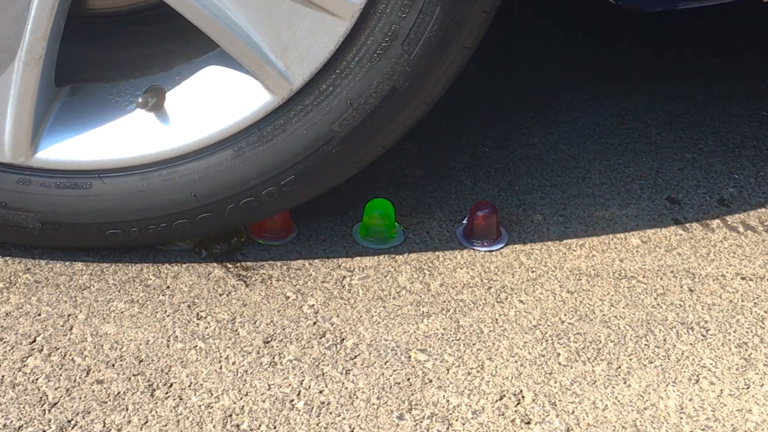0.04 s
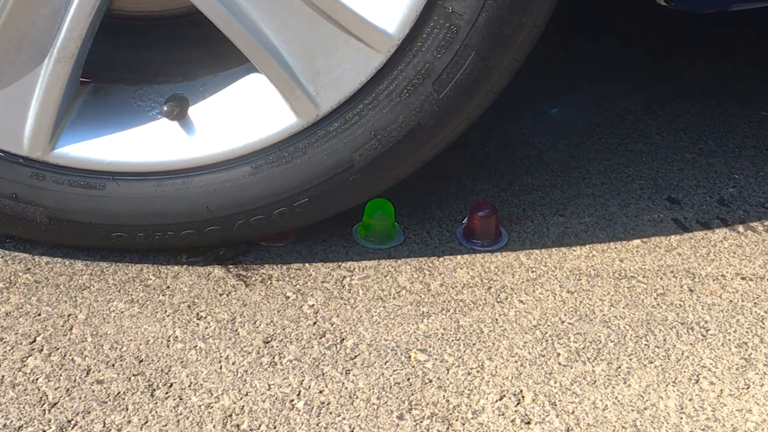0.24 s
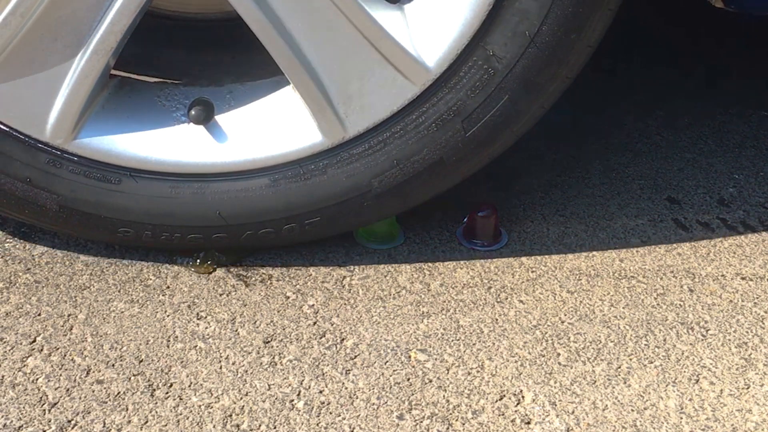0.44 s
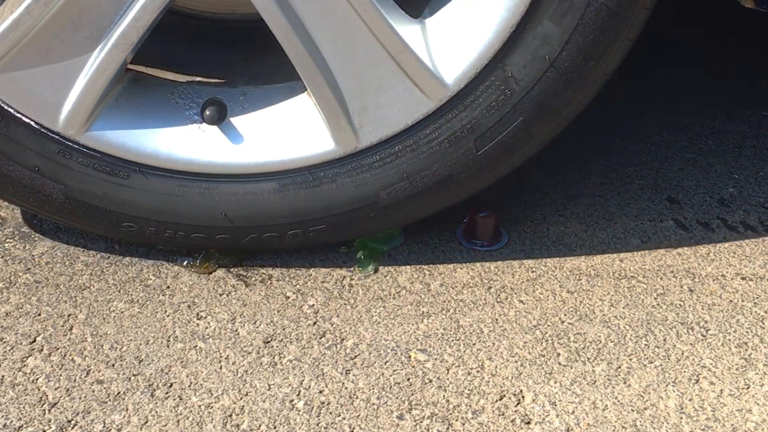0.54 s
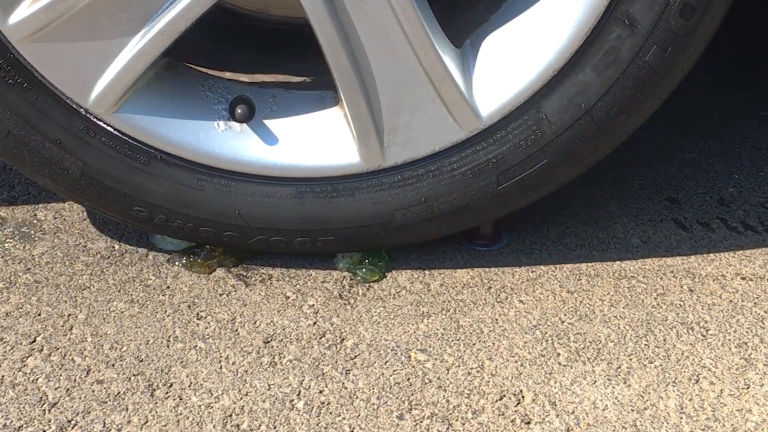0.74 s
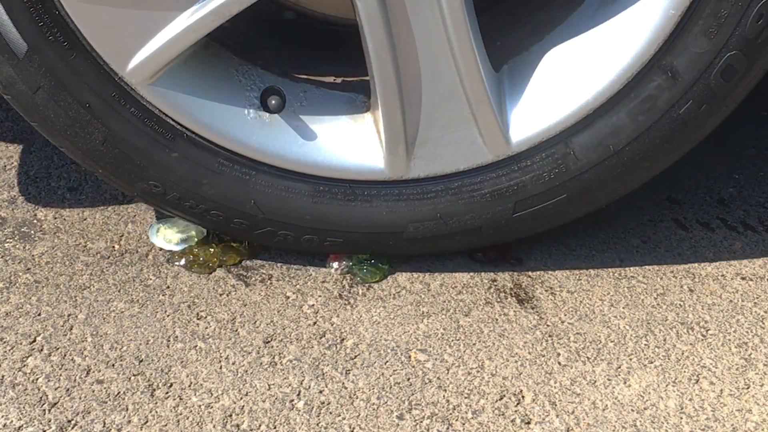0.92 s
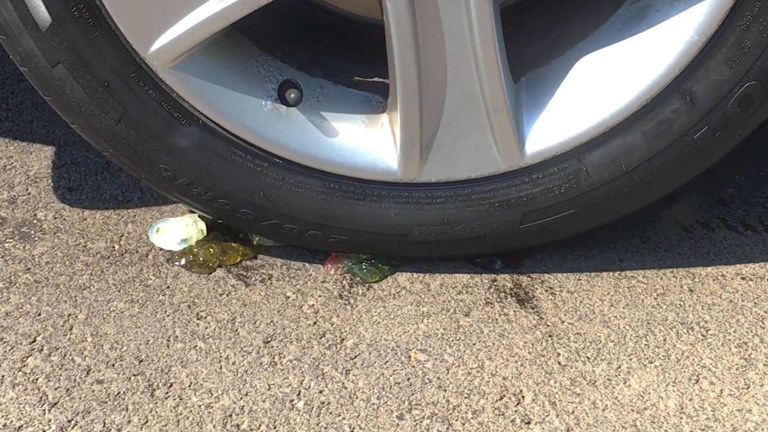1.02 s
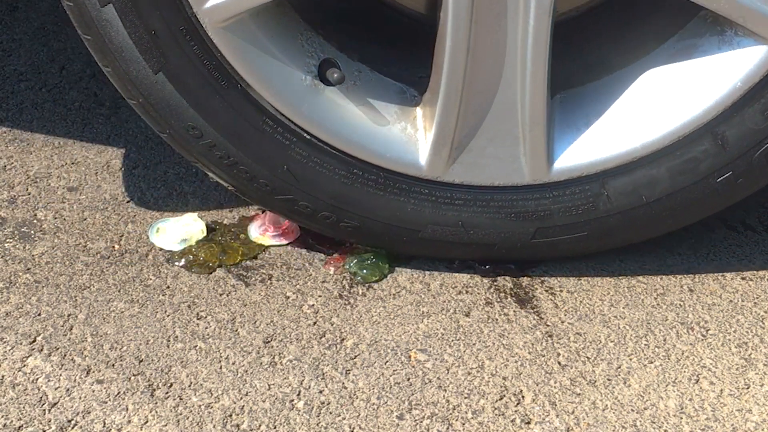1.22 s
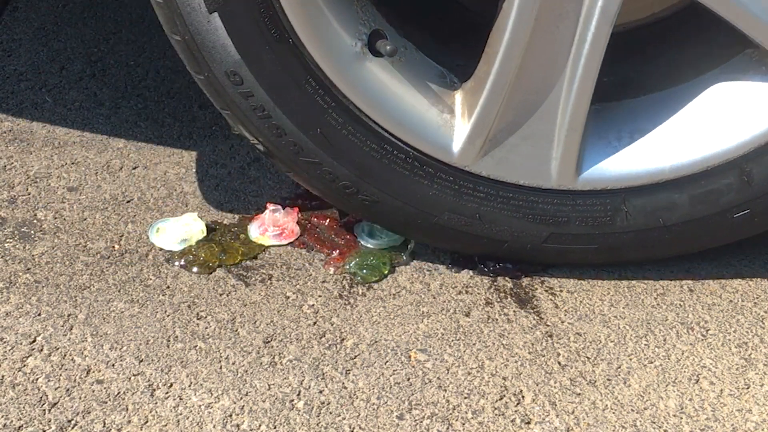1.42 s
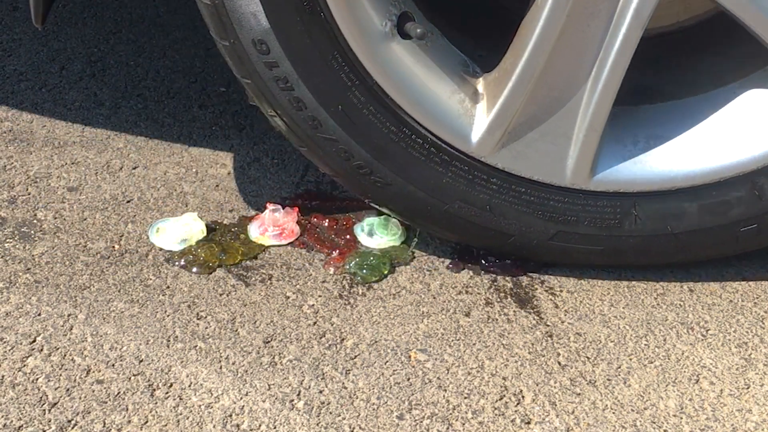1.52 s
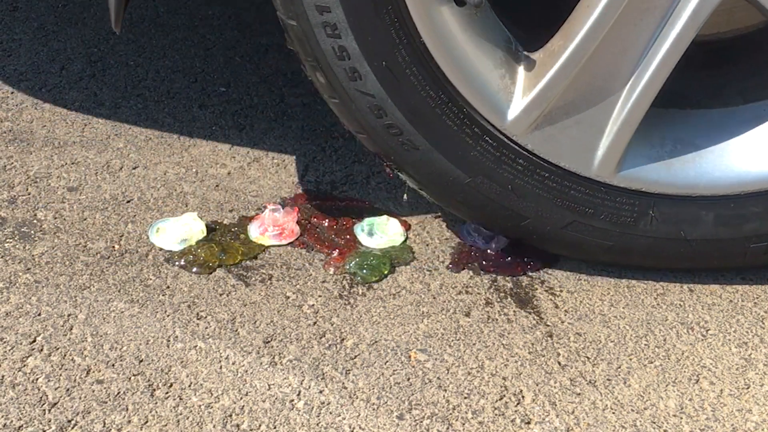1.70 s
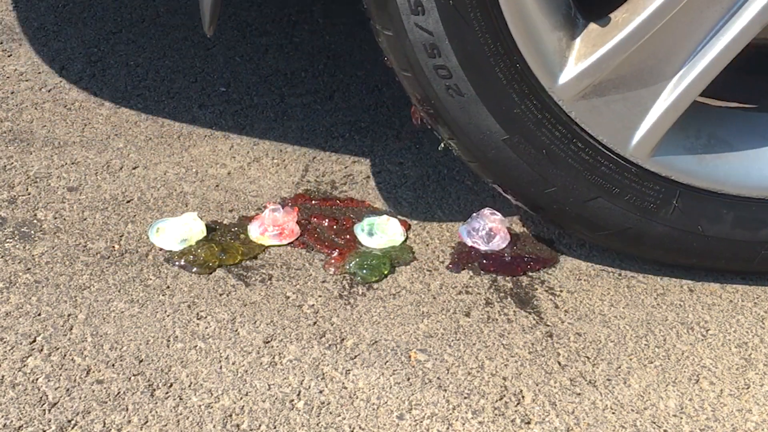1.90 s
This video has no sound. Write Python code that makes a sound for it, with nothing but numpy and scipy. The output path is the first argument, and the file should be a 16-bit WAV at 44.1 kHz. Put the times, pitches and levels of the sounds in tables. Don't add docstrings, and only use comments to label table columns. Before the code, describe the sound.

Plastic jelly cups pop under a creeping car tyre: cracks and a loud burst, a weaker one, a crumple, then another loud burst. The engine throbs and grit ticks on asphalt, heard close, outdoors.

```python
import sys
import numpy as np
from scipy import signal
from scipy.fft import rfft, irfft, next_fast_len
from scipy.io import wavfile
from scipy.ndimage import map_coordinates

SR = 44100
rng = np.random.default_rng(int(sys.argv[2]) if len(sys.argv) > 2 else 0)


def dump(signal):
    limited = np.clip(np.atleast_2d(signal).T, -1, 1)
    pcm = np.round(limited * 32767).astype(np.int16)
    wavfile.write(sys.argv[1], SR, pcm)


def volts(x):
    e = np.asarray(x, float) / 20
    return 10 ** e


N = 85995

# time in seconds, throb level in dB.
LOAD = [(0, -2), (.14, 0.5), (.27, -1.5), (.31, 14), (.37, -2), (.5, -0.5), (.62, -1), (.67, 2),
        (.82, -4.5), (.87, 2), (.92, -7), (1.05, -2.5), (1.25, -0.5), (1.4, -1.5), (1.55, -0.5),
        (1.7, -0.5), (1.75, -6), (1.95, 1)]
# multiple of the firing rate, level in dB.
THROB = [(1, -13.5), (2, 3.5), (3, -4), (4, -1), (5, -17.5), (6, -22), (7, -20.5), (9.3, -18.5)]
# frequency in Hz, level in dB per Hz.
RUMBLE = [(13, -52.5), (22, -19.5), (35, -13.5), (59, 5.5), (113, -5), (205, -19), (400, -50.5), (520, -83),
          (880, -120)]
# frequency in Hz, level in dB per Hz.
HISS = [(150, -6), (250, -0.5), (915, -13), (3400, -23.5), (5000, -30), (10500, -30.5), (13500, -46),
        (16500, -74)]
# frequency in Hz, level in dB per Hz.
CLATTER = [(350, -37.5), (600, -1), (940, -12.5), (1720, -10.5), (2520, -16.5), (5000, -24.5),
           (10000, -33.5), (13000, -57)]
# frequency in Hz, width in Hz, level over the rest in dB.
ENGINE_BLOCK = [(908, 17, 15.5), (1237, 50, 6.5), (2315, 30, 7), (3310, 100, -1.5), (6100, 45, 11),
                (9600, 22, -4)]
# start in seconds, level in dB, frequency in Hz, time to fall 60 dB in seconds.
KNOCKS = [(.003, -46, 3058, 0.046), (.2118, -23.5, 343, .08), (.356, -53, 2240, 0.071),
          (0.589, -52, 3320, 0.21), (0.61, -41.5, 4920, 0.051), (.613, -35.5, 586, 0.061),
          (.674, -46, 1360, 0.033), (0.826, -40, 8800, 0.0083), (.8312, -23, 3900, 0.0095),
          (0.832, -34, 5000, 0.009), (.8312, -39, 9000, 0.011), (.853, -50, 4300, 0.026),
          (.864, -55, 4160, 0.025), (.9465, -4.5, 1180, 0.025), (0.9466, -16.5, 6500, 0.028),
          (0.92, -53, 3080, 0.013), (1.084, -42.5, 920, 0.11), (1.14, -38.5, 267.6, 0.15),
          (1.245, -54.5, 3580, 0.085), (1.246, -59, 6610, .04), (1.283, -54, 4500, 0.047),
          (1.281, -55, 2450, .04), (1.356, -47, 2553, .12), (1.361, -60, 8700, .07),
          (1.361, -59, 13800, 0.088), (1.544, -61, 13440, 0.076), (1.546, -57, 6500, .02),
          (1.589, -50.5, 1480, 0.099), (1.8, -65.5, 5200, 0.03), (1.61, -56, 4230, .06),
          (1.705, -51.5, 3370, .08), (1.707, -55, 2560, .07), (1.794, -46, 2707, 0.073),
          (1.861, -61.5, 3700, .064), (.256, -9, 3000, 0.0086), (.256, -20, 4300, 0.0089),
          (.9445, -16.5, 2600, .012), (.9445, -19, 4100, 0.013), (.97, -34, 2500, .07),
          (.972, -44, 4100, .07)]
# start in seconds, bright level in dB, cup ring in dB, centre in Hz.
CRACKS = [(0.206, -22.5, -43.5, 13500), (0.2118, -16, -27, 11700), (0.2387, -19.5, -34, 8800),
          (0.5862, -46, -71, 12500), (0.603, -45, -79, 11000), (0.6098, -41, -68, 9000),
          (0.6107, -25.5, -51, 12800), (0.6131, -21.5, -35.5, 12200), (0.6312, -36.5, -44, 9500),
          (.641, -50, -70, 14000), (.657, -49, -54, 11000), (.7175, -53, -71, 14100),
          (.898, -54, -56, 10500), (.93, -46.5, -63, 11800), (0.9488, -30, -30, 9000),
          (1.016, -53, -57, 8300)]
# frequency in Hz, level in dB, time to fall 60 dB in seconds.
CUP = [(850, -15, 0.032), (1254, -9, 0.065), (1410, 0.5, 0.032), (1836, -3.5, 0.016)]
# frequency in Hz, level in dB per Hz.
SHELL = [(2500, -44), (5000, -23.5), (6900, -32), (7700, -6.5), (9000, -6.5), (15200, -6.5), (16500, -29)]
# start in seconds, then snap, spray, thump and late thump levels in dB.
POPS = [
    (0.2564, 6.5, -27.5, -13, -24.5),
    (.6710, -10, -51.5, -19.5, -42),
    (0.945, 2.5, -27.5, -13, -25),
]
# frequency in Hz, level in dB per Hz.
SNAPS = [
    [(410, -54.5), (700, 12.5), (2040, 9), (3610, -2), (5810, -20), (9100, -3.5), (12300, -6), (14600, -5),
     (16500, -30.5)],
    [(880, -23), (1500, -19.5), (4340, -48), (7250, -17), (8950, 4.5), (11400, -1), (12300, -6),
     (14100, 4.5), (16500, -1.5)],
    [(410, -49.5), (700, -3.5), (1550, -20.5), (2660, -9), (5300, -17), (6700, 7.5), (7660, -7),
     (15400, -4.5), (16500, -24)],
]
# frequency in Hz, level in dB per Hz.
SPRAYS = [
    [(350, 3.5), (600, -10.5), (748, -15), (1730, -10), (1880, -19.5), (2070, -21), (6030, -27.5),
     (13800, -10.5), (16000, -27)],
    [(590, -42), (1000, -3), (1550, 5), (1710, -28), (2130, 1.5), (3300, -19), (3580, -12.5), (9940, 1),
     (16000, -11.5)],
    [(350, -32.5), (600, 4), (834, -17.5), (1140, -5.5), (2440, -17), (4800, -19), (6830, -16),
     (16000, -30)],
]
UPPER_RING_DB = [0, -3, 0]
THUMP_LAG_S = [0, .0007, 0]
# delay in seconds, frequency in Hz, half length in seconds, level in dB.
PUFFS = [(.0036, 300, .0022, -2), (.0154, 275, .0027, -3.5), (.009, 140, .007, -15), (.029, 150, .006, -14)]
# delay in seconds, frequency in Hz, rise in seconds,
# time to fall 60 dB in seconds, level in dB.
EARLY_RETURNS = [(.0015, 582.4, 0.0028, 0.026, 4), (.013, 557, 0.0047, 0.032, -6.5)]
# delay in seconds, frequency in Hz, rise in seconds,
# time to fall 60 dB in seconds, level in dB.
LATE_RETURNS = [(0.027, 112.5, 0.0066, 0.15, -1.5), (.0435, 239.6, .01, 0.081, 9),
                (.0435, 238, .01, 1, -32), (0.047, 330, .004, 0.14, -17)]
# frequency in Hz, width in Hz, level in dB.
WASH = [(330, 290, 0)]
# time in seconds, level in dB.
LEAK = [(.598, -90), (.604, -55), (.613, -54), (.65, -61), (.668, -61), (.673, -53), (.7, -66), (.722, -75),
        (.745, -84.5)]
# time in seconds, level in dB.
SQUEEZE = [(.8152, -71), (.8157, -45.5), (.822, -50.5), (.828, -44.5), (.833, -48), (.84, -48), (.848, -58),
           (.868, -63.5), (.892, -71)]
# frequency in Hz, width in Hz, level in dB.
SQUEEZED = [(3920, 350, 3.5), (4300, 500, -6), (5000, 600, -3.5), (6150, 400, -13), (8800, 370, -8.5),
            (10900, 900, -18.5)]

FIRING_HZ, FIRST_FIRING_S = 25.8, 0.002
THROB_DB, THROB_SWAY_DB, RUMBLE_DB, HISS_DB = -45, 1, -49.5, -60
CLATTER_DB, CLATTER_T60, CLATTER_SCATTER_DB = -55, 0.11, -2
KNOCK_RISE_S, KNOCK_WIDTH, KNOCK_SCRAPE_DB, KNOCK_TONE_DB = 0.0015, 0.1, -16, -4
BLUR_HZ = 2000
CRACK_T60, CRACK_RISE_S, CRACK_WIDTH = 0.0045, 0.0003, 0.54
CRACK_TAIL_DB, CRACK_TAIL_T60 = -23.5, 0.074
SNAP_T60, TEAR = 0.0035, 2.5
SPRAY_T60, SPRAY_END_S, SPRAY_FADE_S, LOW_HZ = 0.14, 0.045, 0.01, 450
GUSH_T60, GUSH_DB, SPLUTTER_DB = 0.032, 6.5, 1.5
MIST_HZ, MIST_END_S, MIST_FADE_S = 5500, 0.078, 0.03
WASH_DB, WASH_T60 = -8, 0.11
LUMPS_DB = 3.5
TOP_HZ = 16000


def unit(x):
    return x / np.sqrt(np.mean(x ** 2) + 1e-20)


def along(points, hz):
    f, v = np.transpose(points)
    return np.interp(np.log(hz + 1), np.log(f + 1), v)


def curve(rows):
    return np.interp(np.arange(N) / SR, *np.transpose(rows))


def wobble(rate):
    knots = rng.standard_normal(int(N * rate / SR) + 4)
    return map_coordinates(knots, [np.arange(N) * rate / SR])


def noise(gain, size=N):
    m = next_fast_len(size + 8192)
    spectrum = rfft(rng.standard_normal(m)) * gain(np.fft.rfftfreq(m, 1 / SR))
    return unit(irfft(spectrum, m)[:size])


def peaks(rows, f):
    return sum(volts(db) * abs(1j * f * w / (c * c - f * f + 1j * f * w)) for c, w, db in rows)


def ring(t, hz, rise, t60, db):
    t = np.maximum(t, 0)
    return -volts(db - 60 * t / t60) * (1 - np.exp(-t / rise)) * np.sin(2 * np.pi * hz * t)


def burst(shape, sound):
    shaped = shape * sound
    return shaped * np.linalg.norm(shape) / np.linalg.norm(shaped)


def struck(points, x):
    cep = irfft(np.log(volts(along(points, np.linspace(0, SR / 2, 1025)))))
    cep[1:1024] *= 2
    cep[1025:] = 0
    y = signal.fftconvolve(x, irfft(np.exp(rfft(cep))))[:len(x)]
    return y / np.linalg.norm(y)


def add(track, s, x):
    part = track[round(s * SR):][:len(x)]
    part += x[:len(part)]


def engine():
    turns = (np.arange(N) / SR - FIRST_FIRING_S) * FIRING_HZ
    throb = np.zeros(N)
    for k, db in THROB:
        sway = volts(db + THROB_SWAY_DB * wobble(5.5))
        throb += sway * np.sin(2 * np.pi * (k * turns + rng.random()))
    rumble = noise(lambda f: volts(along(RUMBLE, f)))
    hiss = noise(lambda f: volts(along(HISS, f)) * (1 + peaks(ENGINE_BLOCK, f)))
    hiss *= volts(1.2 * wobble(25.0))

    strengths = CLATTER_SCATTER_DB * rng.standard_normal(int(turns[-1]) + 2)
    size_db = strengths[np.floor(turns).astype(int)]
    phase = turns % 1
    gate = volts(size_db - 60 * phase / FIRING_HZ / CLATTER_T60) * np.minimum(phase * 8, 1)
    clatter = gate * noise(lambda f: volts(along(CLATTER, f)) * (1 + peaks(ENGINE_BLOCK, f)))
    low = volts(THROB_DB + curve(LOAD)) * throb + volts(RUMBLE_DB) * rumble
    return low + volts(HISS_DB) * hiss + volts(CLATTER_DB) * clatter


def knocks():
    out, t = np.zeros(N), np.arange(SR // 8) / SR
    for s, db, hz, t60 in KNOCKS:
        def colour(f):
            narrow = peaks([(hz, KNOCK_WIDTH * hz, 0)], f) ** 2
            scrape = peaks([(hz, hz, KNOCK_SCRAPE_DB)], f) * peaks([(hz, hz, 0)], f)
            return narrow + scrape

        roughness = np.minimum(hz / BLUR_HZ, 1)
        shape = volts(db - 60 * t / t60) * (1 - np.exp(-t / KNOCK_RISE_S))
        blur = burst(shape, noise(colour, size=len(t))) * roughness
        tone = ring(t, hz, KNOCK_RISE_S, t60, db + KNOCK_TONE_DB * roughness)
        add(out, s, blur / 2 + tone / 2)
    return out


def cracks():
    out, t = np.zeros(N), np.arange(SR // 8) / SR
    rise = np.minimum(t / CRACK_RISE_S, 1)
    for s, bright_db, ring_db, hz in CRACKS:
        def colour(f):
            return peaks([(hz, CRACK_WIDTH * hz, 0)], f) ** 2 * volts(along(SHELL, f))

        tick = burst(volts(-60 * t / CRACK_T60) * rise, noise(colour, size=len(t)))
        tail = noise(lambda f: volts(along(SHELL, f)), size=len(t))
        tail *= volts(CRACK_TAIL_DB - 60 * t / CRACK_TAIL_T60) * rise
        cup = np.zeros(len(t))
        for c, db, t60 in CUP:
            cup += ring(t, c * rng.normal(1, 0.02), 0.0006, t60, db + rng.normal(0, 2))
        add(out, s, volts(bright_db) * (tick + tail) + volts(ring_db) * cup)
    return out


def snap(t, colour):
    crackle = volts(-60 * t / SNAP_T60) * rng.standard_normal(len(t))
    return struck(colour, crackle + TEAR * (t == 0))


def jelly_spray(t, colour):
    def high(f):
        return 1 / (1 + (MIST_HZ / (f + 1)) ** 4)

    def stop(s, fade):
        return 1 / (1 + np.exp(np.minimum((t - s) / fade * 4, 50)))

    wet = noise(lambda f: volts(along(colour, f)) * (1 - high(f)) * (f > LOW_HZ), size=len(t))
    wet *= stop(SPRAY_END_S, SPRAY_FADE_S)
    mist = noise(lambda f: volts(along(colour, f)) * high(f), size=len(t))
    mist *= stop(MIST_END_S, MIST_FADE_S)
    f = np.linspace(0, SR / 2, 999)
    share = np.linalg.norm(volts(along(colour, f)) * [1 - high(f), high(f)], axis=1)
    mix = share / np.linalg.norm(share) @ [wet, mist]
    gush = volts(GUSH_DB - 60 * t / GUSH_T60)
    flow = (volts(-60 * t / SPRAY_T60) + gush) * np.minimum(t / 0.0023, 1)
    return volts(SPLUTTER_DB * wobble(200)[:len(t)]) * flow * mix


def thump_puffs(t):
    puffs = np.zeros(len(t))
    for s, hz, half, db in PUFFS:
        puffs += volts(db) * np.exp(-((t - s) / half) ** 2 / 2) * np.cos(2 * np.pi * hz * (t - s))
    return puffs * np.minimum(t / 0.001, 1)


def low_wash(t):
    shape = volts(WASH_DB - 60 * t / WASH_T60) * np.minimum(t / 0.015, 1) ** 2
    return shape * noise(lambda f: peaks(WASH, f) ** 2, size=len(t))


def pops():
    out, t = np.zeros(N), np.arange(SR // 2) / SR
    upper = sum(ring(t - s, *mode) for s, *mode in EARLY_RETURNS)
    late = sum(ring(t - s, *mode) for s, *mode in LATE_RETURNS)
    puffs = thump_puffs(t)
    bursts = zip(POPS, SNAPS, SPRAYS, UPPER_RING_DB, THUMP_LAG_S)
    for levels, snap_colour, spray_colour, ring_db, lag in bursts:
        s, snap_db, spray_db, thump_db, late_db = levels
        add(out, s, volts(snap_db) * snap(t, snap_colour) + volts(spray_db) * jelly_spray(t, spray_colour))
        thump = puffs + volts(ring_db) * upper + low_wash(t)
        add(out, s + lag, volts(thump_db) * thump + volts(late_db) * late)
    return out


def leak():
    fizz = np.zeros(N)
    for hz in (9000, 14000):
        splutter = volts(3.7 * wobble(300))
        fizz += splutter * noise(lambda f: volts(along(SHELL, f)) * peaks([(hz, 5000, 0)], f))
    level = curve(LEAK)
    return volts(level) * unit(fizz) * (level > -84)


def squeeze():
    modes = np.zeros(N)
    for row in SQUEEZED:
        lumps = volts(row[2] + LUMPS_DB * wobble(350))
        modes += lumps * noise(lambda f: peaks([row], f) ** 2)
    level = curve(SQUEEZE)
    return volts(level - 40 * (level < -70)) * unit(modes)


def scene():
    return (engine() + pops() + cracks() + squeeze() + knocks() + leak())[None]


def top_cut(x):
    return signal.sosfilt(signal.butter(12, 17040, fs=SR, output="sos"), x)


def record(dry):
    limit = 1 / np.sqrt(1 + (np.fft.rfftfreq(N, 1 / SR) / TOP_HZ) ** 80)
    return top_cut(irfft(rfft(dry) * limit, N))


dry = scene()
out = record(dry)
dump(out)
```